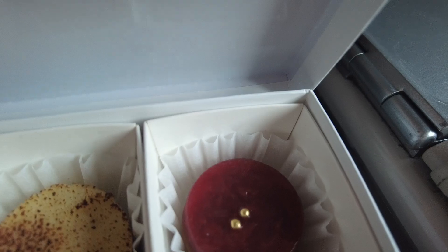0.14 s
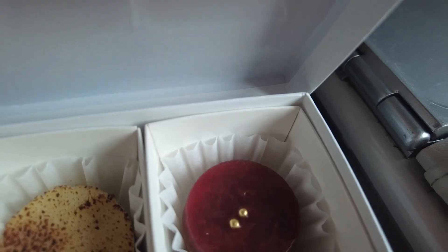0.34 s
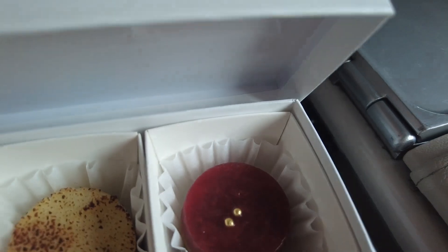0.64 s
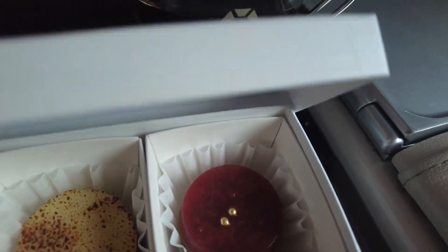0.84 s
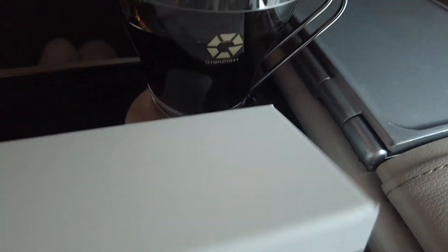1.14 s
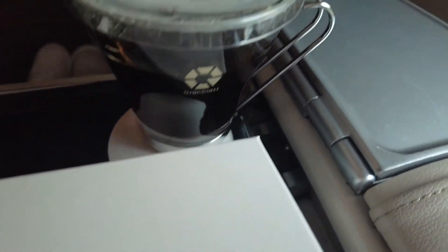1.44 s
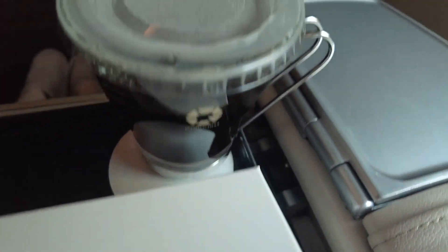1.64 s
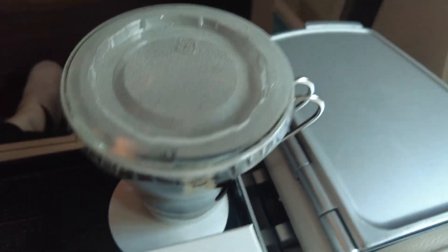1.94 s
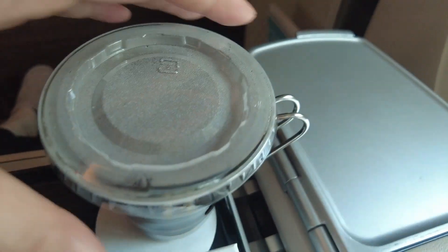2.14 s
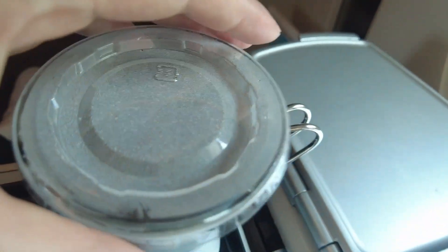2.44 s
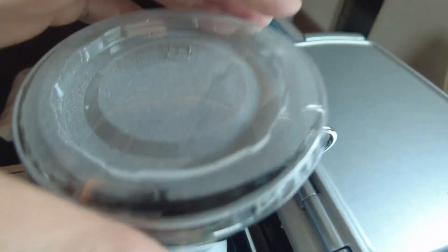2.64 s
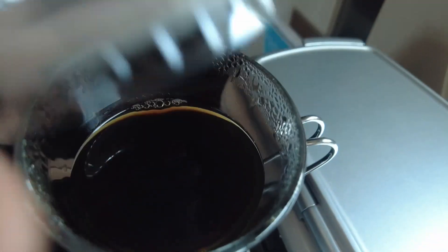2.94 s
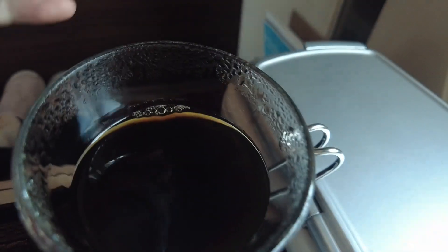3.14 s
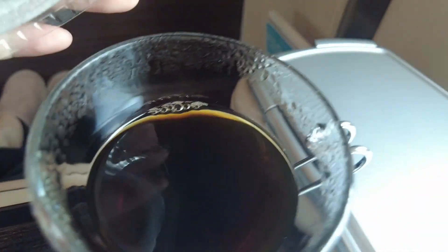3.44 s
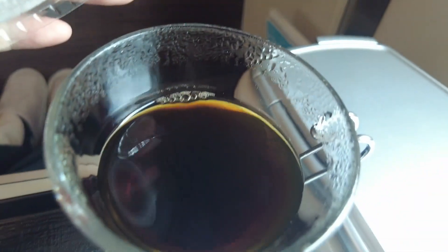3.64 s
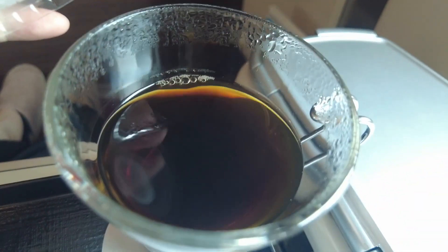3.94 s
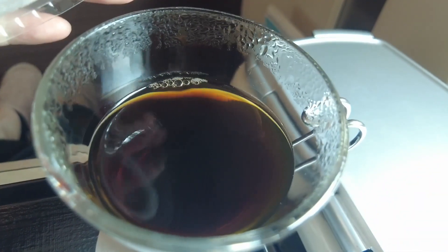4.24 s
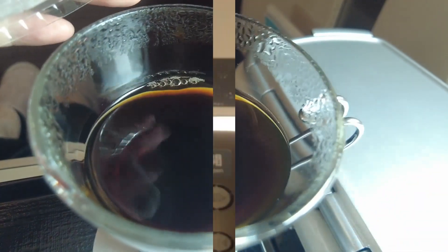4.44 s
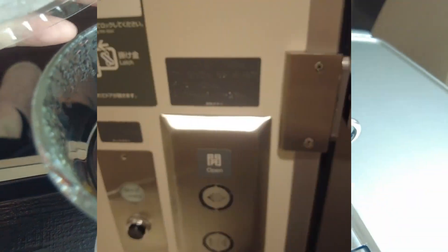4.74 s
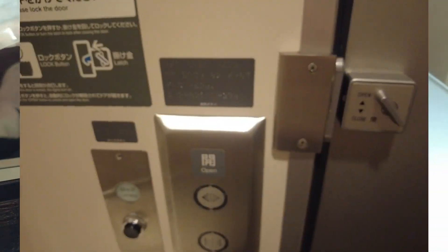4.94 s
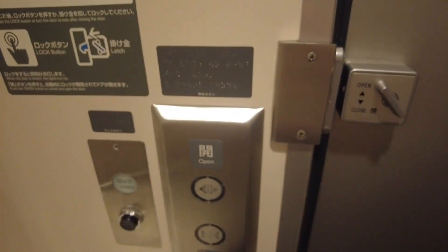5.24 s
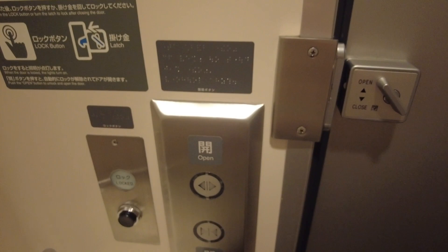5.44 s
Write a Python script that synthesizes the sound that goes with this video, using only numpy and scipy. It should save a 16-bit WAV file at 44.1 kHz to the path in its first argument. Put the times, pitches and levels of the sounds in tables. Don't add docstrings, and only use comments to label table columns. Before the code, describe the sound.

Inside a fast train, a deep, uneven rumble and slow body sway surround a seat, with panel booms, faint duct breaths and a very faint fan note. Close hands make quiet paper rustle, scuffs and ticks, including a crisp one at 0.24 s. From about 1.0 to 1.45 s a card box closes with a soft, falling airy swish, ending in a sharp tick near 1.5 s. Around 2.1-2.2 s come ticks and a distinct dull knock as the plastic lid is grasped, followed by scuffs and small clicks. Light lid snaps sound near 3.5-3.7 s and 4.2 s, then a tight cluster of clicks at 4.6 s. The rumble sinks and at 4.75 s there is a tiny gap. Abruptly, a louder car end takes over until about 5.6 s: broad wheel roar growing until 5.3 s, repeated low jolts, faint high motor whine and airy vent whistle.

```python
import sys
import numpy as np
from scipy import signal
from scipy.fft import irfft
from scipy.io import wavfile
from scipy.ndimage import uniform_filter1d

SR = 44100
rng = np.random.default_rng(int(sys.argv[2]) if len(sys.argv) > 2 else 0)


def bounce(signal):
    frames = np.transpose(np.atleast_2d(signal))
    limited = np.clip(frames, -1, 1)
    pcm = np.round(limited * 32767).astype(np.int16)
    wavfile.write(sys.argv[1], SR, pcm)


def ratio(d):
    e = np.asarray(d, float) / 20
    return 10 ** e


N = 247401
TIME = np.arange(N) / SR
HZ = np.fft.rfftfreq(N + 359, 1 / SR)

# (frequency [Hz], side minus mid [dB])
PORT_SIDE = [(30, -19), (96, -28.5), (150, -15.5), (240, -11), (390, -6.5), (620, -1), (990, 5), (1580, -9),
             (2520, -1.5), (4020, 1), (9000, 1)]
# (frequency [Hz], left minus right [dB])
PORT_BALANCE = [(30, -2.5), (60, -1), (96, -0.5), (240, 0.5), (620, 2), (990, 2), (1580, 0.5), (2520, -0.5),
                (9000, 0)]

# (frequency [Hz], density [dB per Hz])
SEAT_TONE = [(12, -2.5), (22, -3.5), (32, -10.5), (60, -8.5), (92, -14.5), (128, -12), (156, -18),
             (186, -30), (243, -22), (421, -36.5), (799, -47), (1160, -53), (1480, -52.5), (3500, -76.5)]
# (frequency [Hz], density [dB per Hz])
END_TONE = [(23, -1), (35, -8), (55, -5), (90, -7), (134, -15), (238, -23), (402, -33), (784, -38),
            (1020, -45), (1990, -50), (2460, -60.5), (5000, -75.5), (11000, -100), (13000, -112)]
# (frequency [Hz], density [dB per Hz])
RUSTLE_TONE = [(2000, 2.5), (3300, -2.5), (5000, -6), (7000, -9), (8000, -10), (11500, -16), (13200, -13.5),
               (16000, -21.5)]
# (frequency [Hz], width [Hz], level [dB])
SEAT_BOOMS = [(83.4, 11, -39.5), (153.1, 10, -47), (242.1, 22, -49.5), (501, 30, -68.5), (1343, 98, -74),
              (2860, 730, -81.5), (4350, 500, -88)]
# (frequency [Hz], width [Hz], level [dB])
END_BOOMS = [(138.7, 7.9, -38), (171.6, 18, -40), (193, 16, -35), (287.2, 14, -41.5), (309, 13, -44),
             (358, 27, -42), (410, 24, -55), (452, 16, -48.5), (575, 29, -52), (797, 7.4, -55.5),
             (1238, 9.9, -64), (1539, 25, -63), (1730, 14, -68), (10519, 4, -90)]
# (frequency [Hz], width [Hz], level [dB])
VENT_WHISTLES = [(2930, 94, -5), (3050, 76, -8.5), (3112, 90, -5.5), (2960, 570, -5), (3920, 480, -7),
                 (6030, 560, -21.5), (7620, 400, -35), (9300, 300, -36), (10600, 900, -40.5)]

# (time [s], level [dB])
SEAT_SWAY = [(.03, -24), (.41, -32), (.49, -20), (.55, -33.5), (.84, -21.5), (.9, -28.5), (1.29, -25),
             (1.38, -56), (1.43, -20.5), (1.9, -30), (2.17, -30.5), (2.3, -27.5), (2.42, -27), (2.85, -23),
             (3.11, -28.5), (3.3, -20), (3.55, -27), (3.81, -21.5)]
# (time [s], peak [dB], time to sink 10 dB [s])
LAST_SWAYS = [
    (4.13, -24.5, 0.13),
    (4.47, -21.5, 0.08),
    (4.7, -28.5, 0.07),
]
# (time [s], peak [dB], time to sink 10 dB [s])
PANEL_SURGES = [(.03, -36.5, 0.098), (.49, -30.5, 0.062), (.86, -31.5, 0.15), (1.36, -33.5, 0.17),
                (2.14, -34.5, 0.05), (2.31, -31, 0.11), (2.85, -32, 0.44), (3.3, -37, 0.12),
                (3.58, -27.5, 0.15), (3.95, -31.5, 0.1), (4.17, -32, .2), (4.37, -29, 0.055),
                (4.57, -33, .06), (4.68, -35.5, .04)]
# (time [s], level over the usual [dB])
TRACK = [(.03, 3.5), (.35, 0.3), (.7, 0.3), (1.2, 0), (1.8, -0.6), (2.2, -0.2), (2.7, -0.4), (3.2, .3),
         (3.65, 1.4), (4.1, -1), (4.4, 0.8), (4.65, -1)]
# (time [s], peak [dB], time to sink 10 dB [s])
FAN_SURGES = [(.16, -71, 0.028), (.26, -74, 0.03), (.37, -72, 0.037), (.44, -64, 0.043), (.64, -72.5, .04),
              (.85, -76, .05), (.96, -65, 0.035), (1.04, -66, 0.042), (1.17, -65, 0.04), (1.42, -72, 0.049),
              (2.02, -73, 0.039), (2.19, -69.5, 0.081), (2.99, -76, 0.07), (3.18, -80, 0.031),
              (3.28, -76, 0.12), (3.72, -64, 0.037), (3.87, -69, 0.045), (4.06, -69, 0.05),
              (4.32, -67.5, 0.078)]
# (time [s], peak [dB], time to sink 10 dB [s])
DUCT_SURGES = [(.03, -53, 0.054), (.16, -62, .04), (.25, -55, 0.025), (1.26, -51.5, 0.093),
               (1.85, -57.5, 0.16), (2.01, -57, .07), (2.19, -47, 0.031), (2.39, -51, 0.028),
               (2.51, -48.5, .05), (2.77, -51.5, 0.17), (3.2, -56.5, .08), (3.45, -54.5, 0.3),
               (3.73, -53, 0.13), (4.03, -50, 0.099), (4.25, -58, 0.087), (4.58, -62.5, 0.17)]
# (time [s], frequency [Hz])
END_SWAY_PITCH = [(4.78, 74.3), (4.87, 70.37), (4.96, 79.13), (5.07, 60), (5.12, 61.85), (5.2, 81.1),
                  (5.27, 60.1), (5.36, 79.2), (5.45, 60.8)]
# (time [s], peak [dB], time to sink 10 dB [s])
END_JOLTS = [
    (4.855, -14, 0.03),
    (4.96, -15, 0.022),
    (5.07, -11, 0.025),
    (5.155, -11, 0.032),
    (5.31, -15, 0.073),
    (5.59, -18.5, 0.07),
]

# (time [s], rustle [dB])
HANDS = [(.03, -73), (.37, -70), (.59, -77), (.99, -73.5), (1.1, -66.5), (1.31, -71.5), (1.47, -69.5),
         (1.62, -72), (1.89, -72.5), (2.02, -68), (2.14, -66.5), (2.23, -79), (2.4, -70.5), (2.63, -74.5),
         (3.02, -72.5), (3.4, -77), (3.7, -72.5), (4.07, -75.5)]
# (time [s], peak [dB], time to sink 10 dB [s])
CRINKLES = [
    (.03, -79.5, .2),
    (1.47, -76.5, 0.092),
    (1.8, -82.5, 0.12),
    (3.31, -76, 0.077),
    (3.51, -78.5, .1),
]
# (low edge [Hz], high edge [Hz])
CRINKLE_HZ = [(7100, 8900), (12500, 14000)]
# (time [s], body [dB], middle [dB], edge [dB], left minus right [dB])
TICKS = [(.2375, -45.5, -51, -65, -4), (.811, -58.5, -71.5, -79, 4), (.9188, -53.5, -55.5, -60.5, 3),
         (1.4734, -65, -63, -65, -8), (1.515, -41, -45.5, -48.5, 1), (2.0747, -46, -56, -64, -2.5),
         (2.193, -46, -62.5, -79, 0.5), (2.4149, -54, -56, -74.5, 3), (2.588, -58, -56, -69.5, 0),
         (2.6893, -62, -66.5, -76.5, 0.5), (3.134, -59.5, -72, -84.5, 0), (3.8344, -69, -75.5, -84, 0.5),
         (4.2837, -68, -75, -85, -3.5), (4.3504, -53.5, -58.5, -65.5, -4), (4.4114, -60, -65, -75, -1),
         (4.4827, -54, -61.5, -71, 1.5), (4.5965, -62, -61.5, -67.5, 1.5), (4.617, -46.5, -51.5, -69, 1),
         (4.626, -60.5, -60.5, -63.5, -0.5), (4.6355, -45.5, -49.5, -51, 4.5), (4.6412, -56, -63.5, -62, 2),
         (4.6495, -57, -66.5, -70, -1), (4.6592, -50.5, -52.5, -65, -3)]
# (time [s], body [dB], middle [dB], edge [dB], left minus right [dB])
BOX_SCUFFS = [(.165, -61.5, -72, -84.5, -3), (.25, -57, -60, -67, -2.5), (.268, -64, -67.5, -69.5, -1.5),
              (.5356, -57, -68, -80.5, -1), (.607, -59, -62.5, -69.5, 1), (.6588, -56, -61, -70, 0),
              (.7374, -53.5, -62.5, -76.5, -1.5), (.9494, -66, -67, -69, -0.5), (1.08, -60, -63, -67, 3),
              (1.1496, -56, -61.5, -68.5, 0), (1.6397, -50.5, -54, -60.5, -2.5),
              (1.7794, -65, -70, -74, 2.5), (1.8501, -63, -68, -71, -3.5)]
# (time [s], body [dB], middle [dB], edge [dB], left minus right [dB])
LID_SCUFFS = [(.005, -70.5, -69, -69, 0), (1.3554, -61, -64.5, -64, 0), (1.9787, -58, -56.5, -64, 2),
              (2.02, -56, -68, -77.5, 1), (2.084, -55, -65.5, -69.5, -1.5), (2.13, -60.5, -66, -71.5, 0.5),
              (2.188, -49, -67, -79.5, -2), (2.2184, -58, -72, -81, 3.5), (2.3316, -63, -62, -69, -2.5),
              (2.369, -61, -62.5, -74.5, 1.5), (2.482, -59.5, -72, -81.5, 0.5),
              (2.62, -55.5, -59, -70.5, 0.5), (2.662, -57, -63, -74, 0), (2.8027, -63, -69, -73.5, 1),
              (2.9402, -53.5, -63.5, -75, -1), (3.081, -53.5, -60, -69, 2),
              (3.2584, -55.5, -60.5, -63.5, -0.5), (3.3474, -56.5, -63.5, -68, 0.5),
              (3.4073, -61, -67, -72, -0.5), (3.4743, -51.5, -61, -73, 2.5), (3.483, -55, -58.5, -64, -3.5),
              (3.5497, -61.5, -68, -76, -1), (3.7178, -54, -60, -71.5, 1.5), (3.9595, -53, -64.5, -75, 1.5)]
# (time [s], body [dB], middle [dB], edge [dB], left minus right [dB])
RUBS = [(.152, -47.5, -69, -82, -1.5), (.2385, -46.5, -54, -64, -1), (.536, -57.5, -72, -85, 0),
        (2.0747, -54.5, -55.5, -65.5, 2), (2.411, -64.5, -63.5, -77, 2.5), (2.588, -50, -55.5, -64.5, -0.5),
        (4.7035, -76.5, -84, -70, -1.5)]
# (time [s], level [dB], pitch [share of the usual])
SNAPS = [(3.481, -54, 1.1), (3.502, -55, .97), (3.6007, -55.5, 1.01), (3.6623, -51.5, 1.13),
         (3.681, -50, .99), (4.102, -54.5, 1.01), (4.18, -44, .99), (4.3134, -55, 1.01),
         (4.6182, -43.5, 1.02)]
# (frequency [Hz], level [dB], t60 [s])
LID_MODES = [(1072, -6, 0.15), (1823, 3.5, 0.026), (2680, -18.5, 0.028), (3460, -16, .02),
             (4330, -14, 0.028), (5400, -17.5, .012), (6212, -31, .012)]
# (time [s], level [dB], centre [Hz], t60 [s])
KNOCKS = [(0.154, -52, 1200, 0.13), (.238, -47, 560, 0.25), (.495, -44.5, 510, 0.63), (.59, -52, 637, 0.35),
          (.66, -55.5, 645, 0.42), (.811, -55.5, 750, .25), (1.463, -51, 560, .1), (2.08, -50, 420, 0.41),
          (2.186, -32, 395, 0.11), (2.188, -48, 895, 0.12), (2.222, -59.5, 1450, 0.13),
          (2.592, -65.5, 5800, 0.39), (2.655, -68.5, 5900, 0.36), (2.686, -54.5, 1600, .1),
          (3.48, -46.5, 550, 0.25), (3.655, -48, 524, 0.37), (4.0, -50, 550, .6), (4.19, -55, 560, 0.48)]
# (time [s], centre [Hz], level [dB])
LID_SWING = [(.98, 1250, -90), (1.05, 1250, -60), (1.12, 1420, -54), (1.19, 1301, -55.5), (1.27, 1050, -54),
             (1.33, 1000, -57), (1.42, 760, -55), (1.5, 650, -80)]


def unit(x):
    return x / np.sqrt(np.mean(x ** 2))


def shape(points):
    hz, db = np.transpose(points)
    return ratio(np.interp(np.log(HZ + 1), np.log(hz), db))


def curves(table):
    s, *columns = np.transpose(table)
    return [np.interp(TIME, s, column) for column in columns]


def walk(rate):
    hold = int(SR / rate)
    steps = np.repeat(rng.standard_normal(N // hold + 1), hold)
    return 1.4 * uniform_filter1d(uniform_filter1d(steps, hold), hold)[:N]


def surges(rows, rest):
    t = TIME[::64]
    swell = 0
    for s, db, sink_s in rows:
        swell = swell + ratio(db) / np.cosh(np.clip(1.8 * (t - s) / sink_s, -30, 30))
    return rest + np.interp(TIME, t, swell)


def band(x, lo_hz, hi_hz):
    return signal.sosfilt(signal.butter(2, [lo_hz, hi_hz], "bandpass", fs=SR, output="sos"), x)


def add(out, s, x):
    i = int(s * SR)
    out[:, i:i + x.shape[-1]] += x[..., :N - i]


def diffuse():
    mid, side = rng.standard_normal((2, len(HZ))) + 1j * rng.standard_normal((2, len(HZ)))
    side = side * shape(PORT_SIDE)
    lean = np.sqrt(shape(PORT_BALANCE))
    return np.array([(mid + side) * lean, (mid - side) / lean])


def bed(tone, lo_hz, hi_hz, flicker_db, rate):
    field = diffuse() * shape(tone)
    field = field / np.sqrt((1 + (lo_hz / (HZ + 1)) ** 8) * (1 + (HZ / hi_hz) ** 8))
    octave = np.log2(HZ + 1)
    out = 0
    for centre in np.arange(np.floor(np.log2(lo_hz)) - 1, np.log2(hi_hz) + 2):
        window = np.cos(np.pi / 2 * np.clip(octave - centre, -1, 1)) ** 2
        out = out + irfft(field * window)[:, :N] * ratio(flicker_db * walk(rate))
    return out / np.std(out.mean(axis=0))


def booms(modes):
    field = diffuse()
    gain = 0
    for hz, width, db in modes:
        peak = 1 / (1 + (2 * (HZ - hz) / width) ** 2)
        gain = gain + ratio(db) * peak / np.sqrt(np.sum(peak ** 2))
    return irfft(field * gain)[:, :N] * len(HZ)


def sway(hz, wander_hz):
    phase = 2 * np.pi * np.cumsum(hz + wander_hz * walk(9.8)) / SR
    return np.sqrt(2) * np.sin(phase) * ratio(np.array([[-.8], [.8]]))


def rustle():
    dull_db = curves(HANDS)[0] - np.clip(400 * (TIME - 4.665), 0, 8)
    cracks = (rng.random(N) < 60 / SR) * ratio(2.5 * np.minimum(rng.exponential(size=N), 2))
    grain = 1 + .5 * signal.lfilter([1], [1, -ratio(-60 / (0.073 * SR))], cracks)
    dull = bed(RUSTLE_TONE, 2600, 8000, 1.5, 20)
    fine = bed(RUSTLE_TONE, 8000, 16000, 2.5, 20)
    fine_gain = ratio(1.5) * surges(CRINKLES, ratio(dull_db - 7.5))
    return ratio(dull_db + 1.5) * unit(dull * grain) + fine_gain * unit(fine * grain)


def contact(rows, rise_s, crackle_db, t60, middle_db, hold_s, ring_db):
    out, t = np.zeros((2, N)), TIME[:SR // 4]
    for s, body_db, mid_db, edge_db, pan_db in rows:
        noise = 0.56 * rng.standard_normal(len(t)) + 0.52 * rng.standard_normal((2, len(t)))
        crackle = ratio(crackle_db * np.repeat(rng.standard_normal(len(t) // 100 + 1), 100)[:len(t)])
        decay = ratio(-60 * np.maximum(t - hold_s, 0) / max(t60, .005))
        burst = noise * crackle * np.minimum(t / rise_s, 1) * decay
        burst = burst[:, :int((hold_s + t60 + .01) * SR)]
        body = ratio(body_db + 5.5) * band(burst, 1100, 3500)
        middle = ratio(mid_db + middle_db) * band(burst, 3200, 7480)
        ring = sum(band(burst, *edges) for edges in CRINKLE_HZ)
        edge = ratio(edge_db + 6.5) * (band(burst, 6600, 14000) + ratio(ring_db) * ring)
        add(out, s, (body + middle + edge) * ratio(np.array([[pan_db], [-pan_db]]) / 2))
    return out


def ticks_and_scuffs():
    out = ratio(4.5) * contact(TICKS, 0.00043, 0.9, 0.015, 6.5, .0006, -6.0)
    out += contact(BOX_SCUFFS, 0.013, 1.9, 0.12, 7.5, 0.0053, -3.5)
    out += ratio(-2.5) * contact(LID_SCUFFS, 0.0058, 2.5, .18, 6.6, 0.0055, 3)
    return out + contact(RUBS, 0.0021, 2.6, 0.059, 6.3, 0.015, 1.4)


def lid_snaps():
    out, t = np.zeros((2, N)), TIME[:SR // 4]
    for s, db, pitch in SNAPS:
        ring = 0
        for hz, mode_db, t60 in LID_MODES:
            bright_db = .35 * (db + 43.5) * np.log2(hz / 1830)
            ring = ring + ratio(mode_db + bright_db - 60 * t / t60) * np.sin(2 * np.pi * pitch * hz * t)
        add(out, s, ratio(db) * ring)
    return out


def knocks():
    out, t = np.zeros((2, N)), TIME[:SR // 4]
    for s, db, hz, t60 in KNOCKS:
        noise = rng.standard_normal(len(t)) + 0.17 * rng.standard_normal((2, len(t)))
        noise[:, SR // 400] += 0.52 / t60
        edges = hz / 1.7, hz * 1.7
        thud = unit(band(band(noise, *edges), *edges))
        add(out, s, ratio(db - 60 * t / t60) * np.minimum(t / (0.013 * t60), 1) * thud)
    return out


def box_lid_swing():
    hz, db = curves(LID_SWING)
    slow = band(rng.standard_normal((2, N)), 16, 300) * ratio(1.2 * walk(40))
    return ratio(db) * unit(slow) * np.sqrt(2) * np.sin(2 * np.pi * np.cumsum(hz) / SR)


def handling():
    return rustle() + ticks_and_scuffs() + lid_snaps() + knocks() + box_lid_swing()


def fan():
    return surges(FAN_SURGES, ratio(-73.5)) * sway(1374, 5)


def duct():
    breath = booms([(935, 130, 0.0055)]) + ratio(-4.5) * sway(930, 60)
    return ratio(-10) * surges(DUCT_SURGES, ratio(-82)) * breath


def seat_sway():
    sway_db, = curves(SEAT_SWAY)
    swing = surges(LAST_SWAYS, ratio(sway_db - 66 * np.maximum(TIME - 3.815, 0)))
    body = ratio(-0.5) * swing * sway(42.7, 2.52)
    return body + ratio(-3.5) * surges(PANEL_SURGES, ratio(-49)) * sway(120, 4.025)


def seat_rumble():
    track_db, = curves(TRACK)
    late = np.maximum(TIME - 4.69, 0)
    rumble_db = -30.5 + 0.93 * track_db - 300.5 * late
    roll_db = -50.5 + track_db - 87 * late
    rumble = ratio(rumble_db) * ratio(6.0) * bed(SEAT_TONE, 8.8, 183.0, 0.23, 12)
    roll = ratio(8.5) * bed(SEAT_TONE, 179.0, 5000, 1.6, 8) + ratio(51.5) * booms(SEAT_BOOMS)
    return rumble + ratio(roll_db) * roll


def seat():
    return fan() + duct() + seat_sway() + seat_rumble()


def vent(roll_db):
    return ratio(roll_db - 28.5 - 0.5) * booms(VENT_WHISTLES)


def motor(roll_db):
    return ratio(roll_db - 34.5 + 1 * walk(12)) * sway(1976, 1.7)


def end_sway():
    hz, = curves(END_SWAY_PITCH)
    return surges(END_JOLTS, ratio(-37)) * sway(hz, 3.155)


def wheel_roar(roll_db):
    rumble = ratio(roll_db + 10.0) * bed(END_TONE, 18.0, 100, 0.17, 21)
    roar = ratio(-1.0) * bed(END_TONE, 122.6, 11000, 0.05, 12) + ratio(27.5) * booms(END_BOOMS)
    return rumble + ratio(roll_db) * roar


def car_end():
    roll_db = -25 - 8.5 * np.clip(5.267 - TIME, 0, 1)
    return vent(roll_db) + motor(roll_db) + end_sway() + wheel_roar(roll_db)


def scene():
    leave_s, enter_s = 4.75095, 4.76055
    leave = np.clip((leave_s - TIME) / .012 + .12, 0, 1) * (TIME < leave_s)
    enter = np.clip((TIME - enter_s) / .002, 0, 1)
    return (handling() + seat()) * leave + car_end() * enter


def band_limit(x):
    return signal.sosfilt(signal.butter(12, 15830, fs=SR, output="sos"), x)


def record(dry):
    limit = .8
    mix = limit * np.tanh(dry / limit)
    return band_limit(mix)


dry = scene()
out = record(dry)
bounce(out)
```